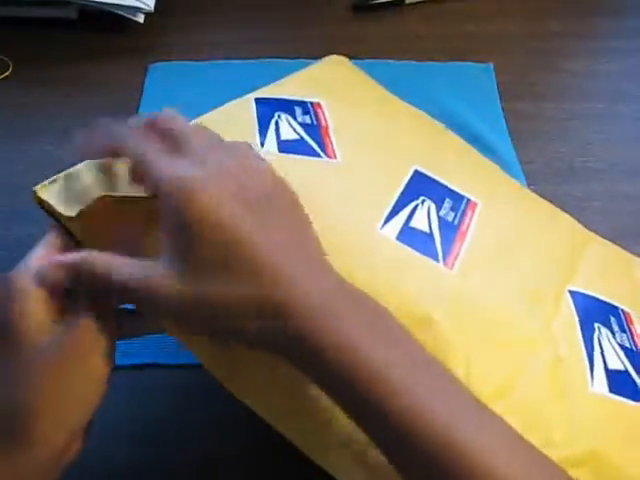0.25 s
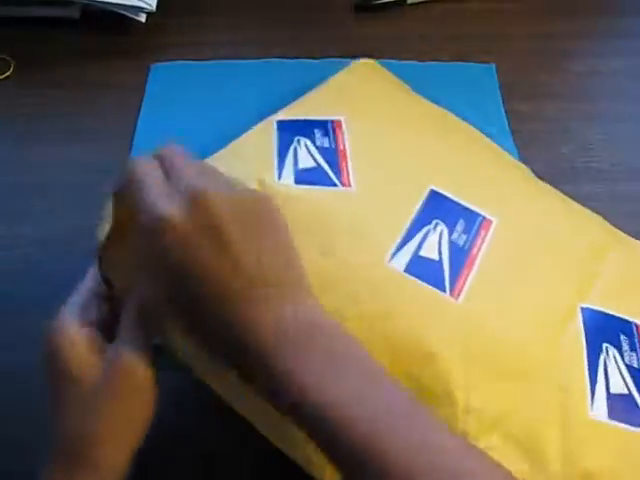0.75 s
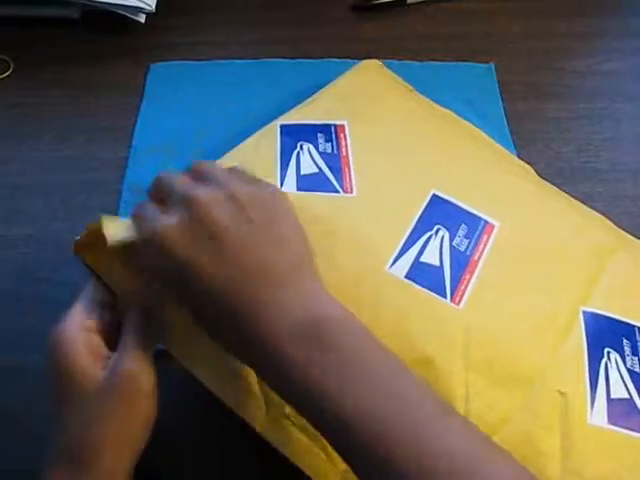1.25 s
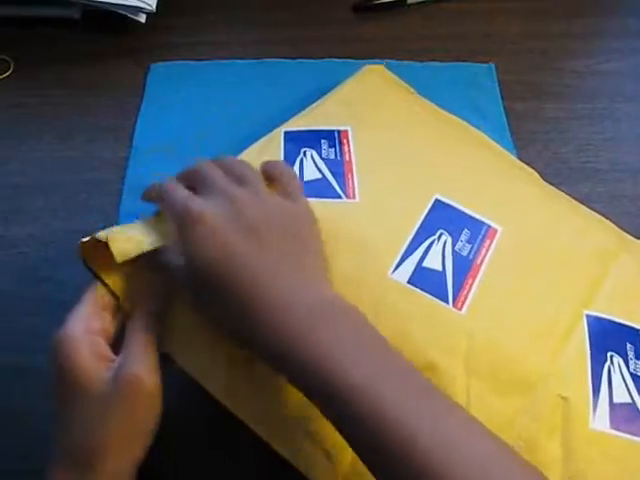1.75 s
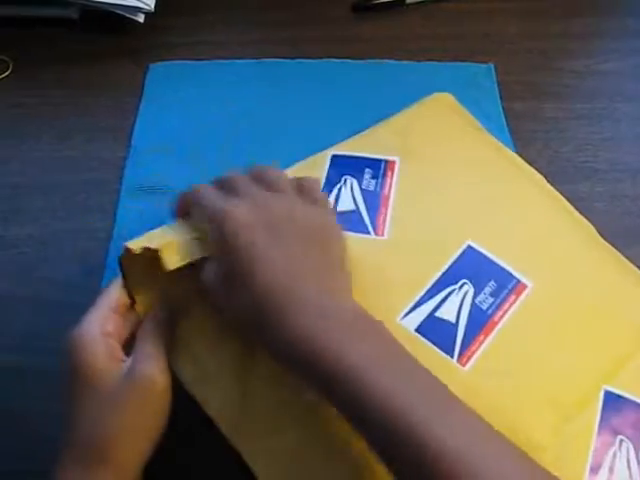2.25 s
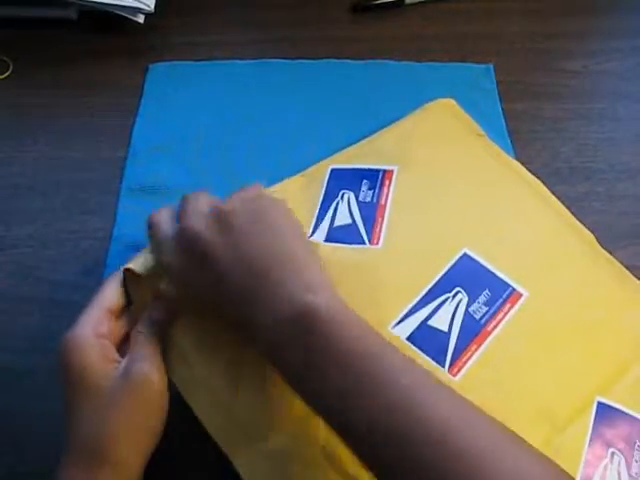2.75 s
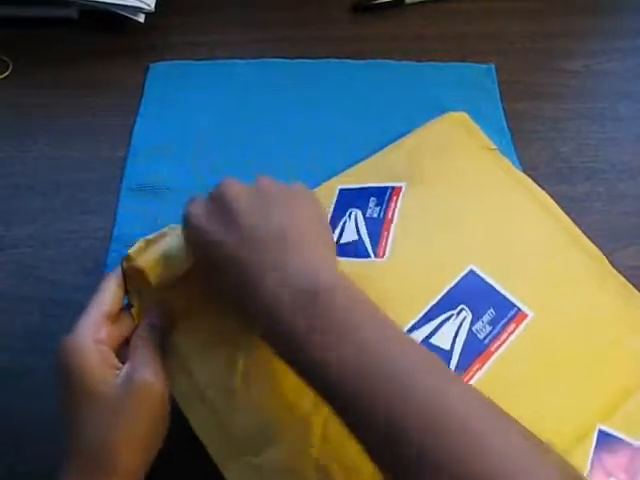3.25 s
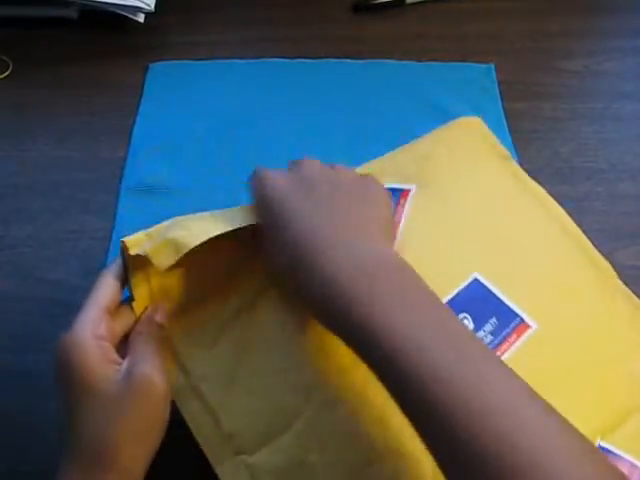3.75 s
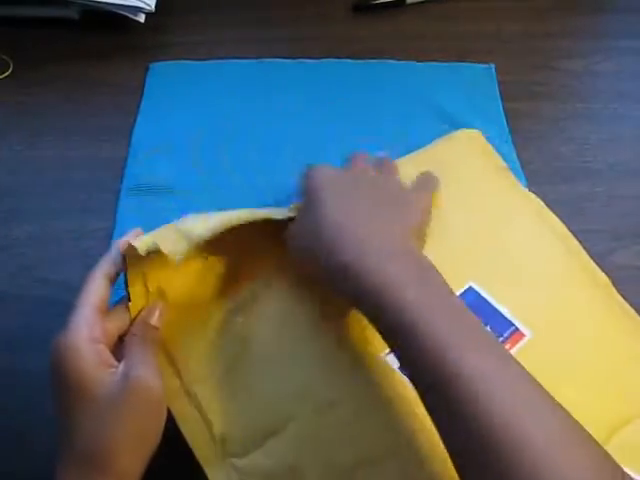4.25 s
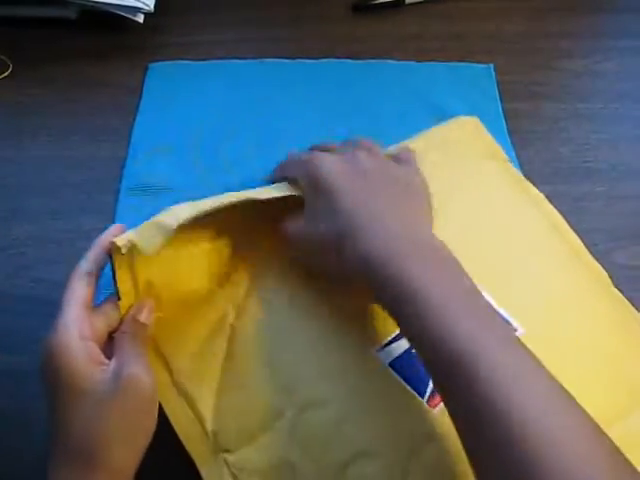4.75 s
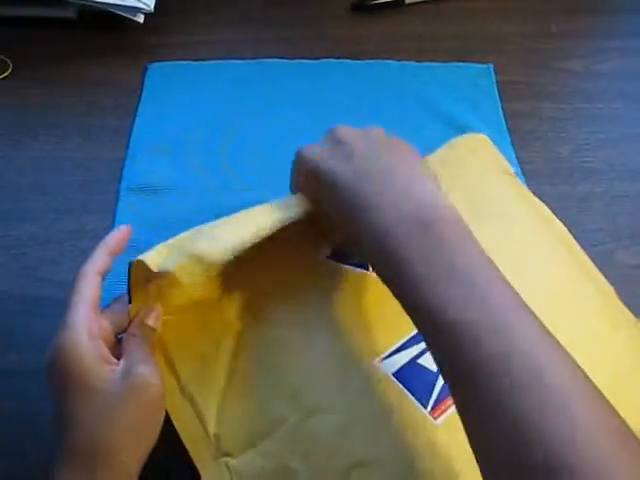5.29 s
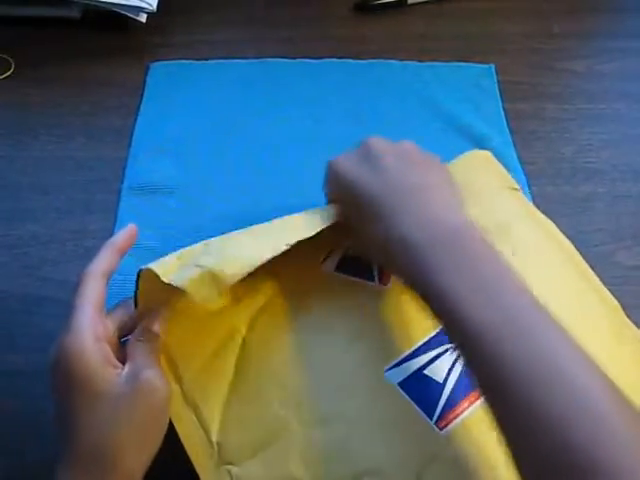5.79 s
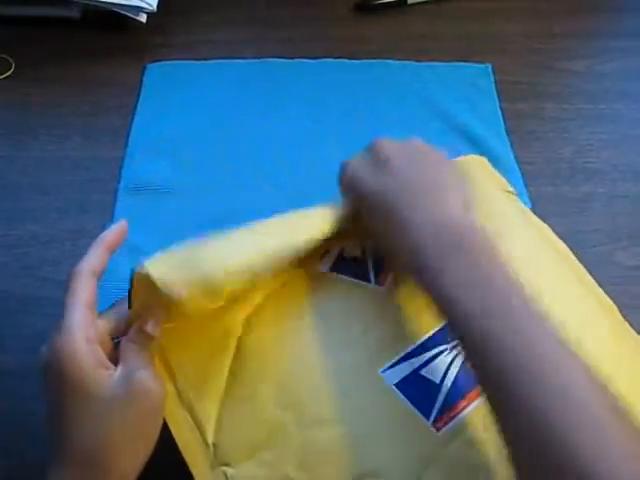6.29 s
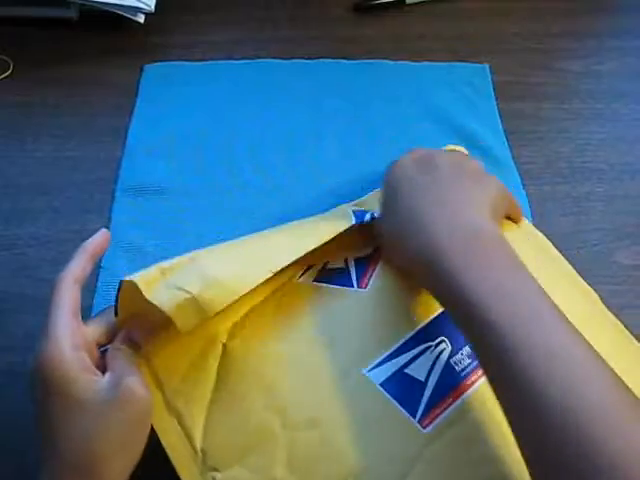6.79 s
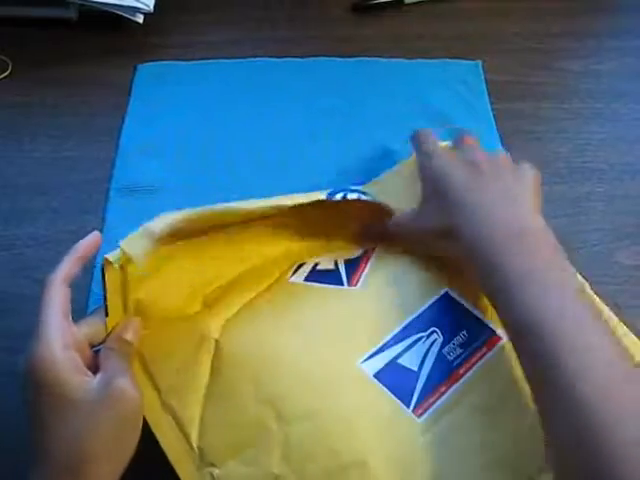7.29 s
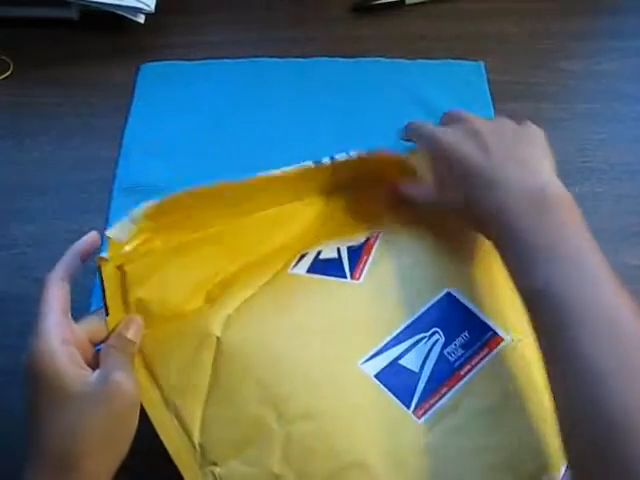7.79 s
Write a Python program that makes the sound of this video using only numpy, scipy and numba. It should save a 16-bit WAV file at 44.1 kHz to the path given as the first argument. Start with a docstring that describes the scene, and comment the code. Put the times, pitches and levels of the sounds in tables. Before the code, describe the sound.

Uneven hand tugs on thick paper: crisp clicks with short gaps at first, then fuller rustling, crumpling and tearing without real pauses. Hard bright snaps jump out of a swarm of tiny crackles, and big paper faces buckle with dull low pulses in the second half. Close stereo pickup, thin in the bass, very short room tail, faint ventilation-like hush.

```python
"""Paper mailer torn open on a table

A padded paper mailer is pulled open by hand, an arm's length from a small stereo camera microphone.
Creases, glue and fibres crackle in swarms of tiny damped rings; single folds snap loudly as clusters of
larger rings. Large faces flop over as low pulses, and two faint, longer low hums ring near 120 Hz.
A quiet furnished room answers with a brief tail of decaying noise, over a faint hush of filtered noise."""
import sys
import numpy as np
from scipy import signal
from scipy.fft import rfft, irfft, next_fast_len
from scipy.io import wavfile
from scipy.ndimage import uniform_filter1d
from numba import njit

SR = 44100
rng = np.random.default_rng(int(sys.argv[2]) if len(sys.argv) > 2 else 0)


def to_wav(sig):
    """Store sig (one row per channel, or 1-D mono) as 16-bit WAV at the path in sys.argv[1].

    Samples outside -1..1 are clipped; the rate is SR.
    """
    pcm = np.clip(np.atleast_2d(sig), -1, 1) * 32767
    pcm = np.round(pcm).astype(np.int16)
    wavfile.write(sys.argv[1], SR, pcm.T)  # frames by channels


N = 354123

# single folds of the paper: (time [s], nominal peak [dB], ring [Hz], panel thump [dB re peak],
# bright crack [dB re peak], crisp edge [dB re peak]); each part of the snap adds its own trim
FOLDS = [(0.024, -6, 1840, -12, -19.5, -39), (0.034, -18, 1690, -7, 0, -19), (0.066, -25, 1500, 0, -6, -15),
         (0.095, -27.5, 3600, 0, -3, 2), (0.144, -17.5, 6470, -32, 0.5, -7),
         (0.243, -16, 1850, -15, -1, -5), (0.292, -7.5, 1620, -16, 5, -2), (0.335, -29, 3750, -14, -5, 4),
         (0.377, -27.5, 3680, -7, 4, -3), (0.397, -29.5, 3900, 4, -3, -8), (0.471, -4, 1440, -30, 2.5, -9),
         (0.535, -18, 1400, 0, 2, -10), (0.687, -28, 2170, -23, -10, -11), (0.777, -6.5, 1600, -36, 0, -9),
         (0.79, -4, 6500, -29, -8, -9), (0.974, -15.5, 3220, -32, -6, -26),
         (0.99, -18.5, 1360, -27, -15, -21), (1.015, -14, 4000, -5, -6, -10),
         (1.021, -7, 2900, -5, 0, -2.5), (1.05, -26, 3510, -15, -2, -3), (1.135, -33, 4200, -20, -3, -12),
         (1.19, -28, 4000, -25, -6, -3), (1.211, -25, 3700, -28, -2, -4), (1.238, -2, 4260, -50, -11, -7),
         (1.27, -29, 4000, -20, -1, -8), (1.274, -22, 5000, -30, -6, -8), (1.31, -2.5, 3340, -49, 0, -18),
         (1.52, -18.5, 1900, -31, 1, -17), (1.56, -22, 2000, -29, -5, 2), (1.807, -28, 7500, -25, -10, 1),
         (1.838, -21, 5600, -27, -2, 0), (2.116, -19, 4870, -20, -7, -11), (2.132, -5, 4840, -40, -17, -28),
         (2.157, -5, 4440, -29, -9, -22), (2.374, -13, 3530, -13, 7, -2), (2.535, -17.5, 3470, -33.5, 6, 1),
         (2.591, -18.5, 5660, -10, -6, 7), (2.627, -18, 1250, -22, -14, -13),
         (2.69, -17, 8900, -14, -18, 0), (2.729, -26, 2410, -2, -8, 13), (2.74, -20.5, 900, -3, -15, -15),
         (2.754, -13, 2600, -20, -6, -10), (2.781, -10, 2460, -26, 4, -17), (2.899, -19, 875, -26, -9, -16),
         (2.919, -13.5, 2500, -8, 6.5, -34), (2.948, -8, 1660, -25, -12, -15),
         (3.017, -21, 1800, -20, -15, -20), (3.036, -12.5, 1660, -24, -20, -27),
         (3.157, -26, 2000, -15, -2, 0), (3.188, -13, 1870, -39, -33, -14), (3.32, -18, 2350, -30, -9, -14),
         (3.327, -16.5, 885, -26, -10, -17), (3.394, -13, 2630, -33, 5, 2),
         (3.437, 2, 2850, -13.5, -0.5, -14), (3.462, -7.5, 1550, -6, -14, -23),
         (3.588, -10, 1960, -9.5, 1.5, -2.5), (3.666, -15.5, 1570, -16, -7, -9),
         (3.752, -13, 2960, -32, -18, -9), (3.801, -11, 2840, -31, -15, -26.5),
         (3.82, -7, 1510, -14, 3.5, -1), (3.928, -0.5, 2740, -29, -7, -7), (4.037, -15, 2160, -6, -7, -1),
         (4.156, -8.5, 1570, -5, 1.5, -11), (4.255, -23, 1500, -12, -6, -12),
         (4.487, -18, 1660, -26, -13, -11), (4.548, -2, 1360, -10, 5.5, -1.5),
         (4.712, -17.5, 2092, -8, -13, 5), (4.795, -15, 1780, -2.5, 2, -8),
         (4.897, -8.5, 1520, -4, -12, -20), (4.948, -16, 920, -11, 9, -16),
         (5.084, -4, 1920, -11, -14, -10), (5.096, -7, 1610, -6, -14, -19), (5.111, -3, 2150, -15, -9, -22),
         (5.116, -6, 940, -8, -13, -17), (5.17, -21, 5800, -30, -8, 0), (5.226, -13, 1470, -36, -11, -9),
         (5.269, -5, 1510, -8.5, -18, -10), (5.465, -30, 2930, -24, -9.5, -16),
         (5.523, -13.5, 1910, -9, 0, -21), (5.6, -20, 1500, -2, -15, -15), (5.626, -17, 786, -2, -13, 2),
         (5.796, -15, 2020, -4, 4, -6.5), (5.804, -6.5, 2420, -22, -4, -5), (5.821, -2, 6000, -25, -12, -8),
         (5.828, -13, 6200, -25, -8, -10), (5.837, -14, 5400, -30, -8, -12),
         (5.841, -11, 5400, -30, -8, -12), (5.848, -9, 1940, -23, -10, -12),
         (5.897, -8.5, 5400, -11, -17, -14), (5.976, -23, 5360, -25, -8, 5),
         (6.093, -12.5, 1460, -28, -16, -15), (6.11, -19, 1490, 3, 5, 1),
         (6.194, -0.5, 8000, -16.5, -26, -31), (6.276, -10, 1890, -8, -20, -28),
         (6.31, -14, 1690, -6, -2, -14), (6.335, -5.5, 1770, -21, 5, -2),
         (6.341, -12.5, 2690, 3.5, -12, -10), (6.612, -18, 1540, -15, 4, 7.5),
         (6.798, -4, 1610, -37, -34, -36), (6.921, -1.5, 2280, -32, -9, -30),
         (6.945, -15, 2000, -16, -3, 2), (6.971, -9, 1540, -25, -9, 8), (6.989, -5.5, 1760, -2, -6, -2),
         (6.999, -5, 2100, -11, 7, -8), (7.017, -12, 3300, 2, -5, -2), (7.128, -15, 2400, 4, 2, -1),
         (7.187, -17.5, 2000, -4, -4, -16), (7.199, -10, 1800, -28, -6, -29),
         (7.209, -13, 2060, -4, -7, -19), (7.232, -24, 3800, -2, -5, -10), (7.35, -20, 1630, -5, 3.5, -14),
         (7.376, -20, 7500, -20, -9, -11), (7.576, -11.5, 1770, -4.5, 6, 7),
         (7.619, -14, 4200, -5, -1, -16), (7.703, -16, 3500, -30, 3, -14), (7.724, -15, 2020, -4, -10, -18),
         (7.923, -15.5, 1380, 0, -4, -20), (7.955, -16.5, 866, -20, -20.5, -9),
         (8.003, -15.5, 5830, -33, -19, 4)]
WIDE_HZ = 1740  # the close ports hear a source differently in full above this


def undb(db):
    """Turns decibels into an amplitude factor."""
    return 10 ** (np.asarray(db) / 20)


def level(x, db):
    """Scales a sound to an RMS level in dB."""
    return x * undb(db) / np.sqrt(np.mean(x ** 2))


def on_bins(table, size):
    """Reads a (frequency [Hz], value) table at every FFT bin, straight on a log axis."""
    hz, value = np.transpose(table)
    bin_hz = np.arange(size // 2 + 1) * SR / size
    return np.interp(np.log(bin_hz + 1), np.log(hz + 1), value)


def walk(rate):
    """Random levels held for 1 / rate seconds and slewed from one to the next; spread near 1."""
    hold = int(SR / rate)
    steps = np.repeat(rng.standard_normal(N // hold + 1), hold)
    return 1.01 * uniform_filter1d(steps, hold)[:N]


@njit
def rings(start, hz, cycles, rise, left, right):
    """Damped sines that swell within a fraction of a cycle and lose 20 dB in the given number of cycles."""
    out = np.zeros((2, N))
    for g in range(len(start)):
        turn = np.exp((2j * np.pi - np.log(10) / cycles[g]) * hz[g] / SR)
        closing = np.exp(-hz[g] / (rise * SR))
        z, gap = 1 + 0j, 1.
        first = int(start[g] * SR)
        last = min(first + int(3 * cycles[g] * SR / hz[g]), N)  # followed down to -60 dB
        for j in range(max(first, 0), last):
            out[0, j] += (left[g] * z).imag * (1 - gap)
            out[1, j] += (right[g] * z).imag * (1 - gap)
            z *= turn
            gap *= closing
    return out


def grains(start, hz, cycles, db, pan_db, sign):
    """Places each ring a little left or right, louder and earlier at the nearer port; long waves reach both alike."""
    rise_cycles = .3
    twist = .28  # radians of lead for each dB of lean
    size = np.sign(sign) * undb(db)
    lean_db = pan_db * np.minimum(hz / WIDE_HZ, 1) ** 2
    half = undb(lean_db / 2) * np.exp(.5j * lean_db * twist)
    return rings(start, np.clip(hz, 80., .4 * SR), cycles, rise_cycles, size * half, size / half)


def slips():
    """Stick and slip: the paper gives way suddenly, then the burst dies off; the hand's work stays the same."""
    slips_per_s, slip_size, fade_s = 90, 0.53, 0.0042
    chance = rng.random((2, N))
    jolts = (chance[0] < slips_per_s / SR) * -np.log(1 - chance[1])
    fading = signal.lfilter([1], [1, -np.exp(-1 / (fade_s * SR))], np.minimum(jolts, 2))
    burst = 1 + slip_size * fading
    return burst / np.sqrt(uniform_filter1d(burst ** 2, size=SR // 20))


def effort():
    """Gain of the four swarms: every tug builds up, holds and dies away, and every fold leaves the paper settling."""
    # tugs of the hand: (full force [s], hold [s], build-up [s per 20 dB], die-away [s per 20 dB],
    # creasing [dB], panel flex [dB re creasing], glue peel [dB re creasing], fibre rip [dB re creasing])
    tugs = [(.0, .12, .1, 0.16, -50, -6, 0, 1), (.25, 0.064, 0.032, 0.15, -49, -1, -5, 1.5),
            (0.433, 0.016, 0.024, 0.22, -37.5, -6.5, -5, -6), (.72, 0.078, 0.12, .05, -50.5, -15, -3, 8),
            (.793, 0.022, 0.043, 0.07, -24, -12.5, -4.5, -4), (1.0, 0.03, 0.082, 0.057, -48, 2, 3.5, 1.5),
            (1.167, 0.11, 0.063, 0.31, -47, -19, -3, -1), (1.38, 0.13, 0.067, 0.093, -49, -27, 0.5, 2),
            (1.534, 0.033, 0.066, 0.048, -35, -21, -4.5, 1), (1.685, 0.034, 0.073, 0.14, -40, -11, -1, -1),
            (1.876, 0.0014, 0.088, 0.11, -38, -10, 0, -4), (1.979, 0.0019, 0.048, 0.11, -32.5, -9, -3, 0.5),
            (2.08, 0.12, .1, 0.12, -35.5, -16, -7, -4), (2.104, 0.031, 0.016, 0.072, -29.5, -5, 7, 2.5),
            (2.335, 0, 0.12, 0.1, -32.5, -3, -3.5, -4), (2.464, 0.04, .03, 0.087, -28.5, -26, -6, -13),
            (2.73, 0.085, 0.32, .07, -31, -8, -3.5, -0.5),
            (2.923, 0.066, 0.052, 0.07, -32.5, -12, -4.5, -7.5),
            (3.097, 0, 0.09, .085, -28, -30, -13, -7.5), (3.223, 0.038, 0.17, 0.13, -34.5, -9, -5.5, -1),
            (3.44, 0, 0.16, 0.074, -21.5, -14, -8.5, -6.5),
            (3.597, 0.0016, 0.056, 0.071, -34, -8, -10, -10), (3.677, 0, 0.025, 0.055, -31, -20, -6, -3.5),
            (3.741, 0.01, 0.038, 0.13, -29.5, -22, -16, -5),
            (3.924, 0.091, 0.17, 0.11, -24.5, -12.5, -9.5, -6.5),
            (4.2, 0.033, 0.084, 0.078, -35.5, -2.5, -5, -4.5),
            (4.33, 0.12, 0.091, 0.053, -31, -9.5, -19, -5), (4.55, 0, 0.32, 0.25, -26.5, -9.5, -13, -8.5),
            (4.664, 0.035, 0.093, 0.053, -31, -6, -20, -1.5), (4.954, 0, 0.23, 0.096, -29, -8.5, -7.5, -4),
            (5.103, 0, 0.13, 0.078, -22.5, -7.5, -10, -8), (5.17, 0, 0.09, .1, -34.5, -14, -4, -5),
            (5.226, 0.09, 0.048, 0.068, -25.5, -11, -4, -3.5),
            (5.6, 0.023, 0.29, 0.02, -34.5, -8, -6.5, -5), (5.72, 0.079, 0.19, .05, -33.5, -5, -8, -7.5),
            (5.796, 0.034, 0.029, 0.15, -21.5, -13, -3.5, -5.5),
            (5.94, 0.016, 0.29, 0.052, -37.5, -5.5, -1, 3), (6.111, 0, 0.061, 0.18, -32, -8, -6, -5.5),
            (6.201, 0.0027, 0.038, 0.07, -34, -6, -18, -1), (6.413, 0, 0.17, 0.092, -23, -8.5, -9.5, -1),
            (6.49, 0.017, .1, 0.064, -36, -19, -5, -0.5), (6.63, 0.056, .09, .2, -39, -7, -3.5, -4),
            (6.745, 0.019, 0.058, 0.031, -32.5, -2.5, -5.5, -6),
            (6.81, 0.08, 0.011, 0.15, -38.5, -1, -10, -0.5),
            (7.004, 0.0042, 0.11, 0.064, -21, -6.5, -6, -4), (7.134, 0.00088, 0.057, 0.049, -34, 2, -9, -9),
            (7.199, 0.048, 0.017, 0.26, -39, -5.5, -6, -4), (7.438, 0.0012, 0.093, 0.048, -28, -6, -11, -5),
            (7.583, 0.03, 0.16, 0.22, -29, -7, -7.5, -1), (7.915, 0, 0.059, 0.077, -32, 0, -7.5, -5.5),
            (8.027, 0, 0.077, 0.088, -29.5, -16, -8, -5)]
    # the paper never lies quite still: (flex [dB], crease [dB], glue [dB], fibre [dB])
    rest_db = [-75, -63, -70.5, -60]
    # rustle after each fold, relative to its nominal peak: (flex [dB], crease [dB], glue [dB], fibre [dB])
    settle_db = [-50, -25.5, -42, -37.5]
    settle_s = 0.03  # per 20 dB
    hop = 64  # samples between gain points
    t = np.arange(0, N + hop, hop)[:, None] / SR

    full_s, hold, build, die, crease_db, flex_db, glue_db, fibre_db = np.transpose(tugs)
    before = np.maximum(full_s - t, 0) / build
    after = np.maximum(t - full_s - hold, 0) / die
    tug_power = undb(2 * (crease_db - 20 * (before + after)))
    mix_db = np.array([flex_db, 0 * full_s, glue_db, fibre_db]).T
    power = tug_power @ undb(2 * mix_db)

    fold_s, peak_db = np.transpose(FOLDS)[:2]
    fallen_db = 20 * np.abs(t - fold_s) / settle_s
    settling = np.sum((t > fold_s) * undb(2 * (peak_db - fallen_db)), axis=1)
    power = power + np.outer(settling, undb(settle_db) ** 2) + undb(rest_db) ** 2
    return [np.interp(np.arange(N) / SR, t[:, 0], np.sqrt(p)) for p in power.T]


def crackle():
    """Four swarms of grains and lone ticks; they bunch together, as one slip of the paper frees many at once."""
    # swarms, a row each for flex, crease, glue, fibre, lone ticks:
    # (pitch spread [octaves], ring-down [cycles per 20 dB], size scatter [dB])
    swarm_kinds = [(0.37, 2.7, 4.0), (0.38, 1.82, 1.5), (0.18, 3.9, 2), (0.43, 1.63, 1), (0.88, 1.4, 2.5)]
    # grain density: (flex [per s], crease [per s], glue [per s], fibre [per s], lone ticks [per s])
    grains_per_s = [1000, 1900, 1500, 4500, 70]
    # the span of the buckling creases changes as the hand moves along: (time [s], crease ring [Hz])
    crease_pitch = [(0.0, 1940), (0.51, 1570), (0.96, 2540), (1.16, 2030), (1.23, 2880), (1.5, 1860),
                    (1.68, 2130), (1.81, 1670), (2.28, 2100), (2.66, 1720), (2.78, 2380), (2.88, 1790),
                    (3.36, 1800), (3.42, 2200), (3.69, 1770), (3.74, 2470), (3.83, 1500), (3.9, 1980),
                    (4.25, 1910), (4.38, 2500), (4.45, 1900), (4.65, 2260), (4.8, 1840), (5.34, 1790),
                    (5.55, 2220), (5.64, 1460), (5.75, 1980), (6.02, 1910), (6.1, 1440), (6.17, 1960),
                    (6.69, 1900), (6.8, 1500), (6.93, 2200), (6.97, 1820), (7.35, 1530), (7.67, 2200),
                    (7.75, 1410), (7.81, 2200), (8.03, 1300)]
    # the size of the peeling patch sets its pitch: (time [s], glue ring [Hz])
    peel_pitch = [(0.0, 4770), (1.38, 4140), (1.79, 4550), (2.13, 4930), (2.75, 5200), (3.29, 4670),
                  (4.67, 5020), (5.28, 5430), (6.13, 5600), (6.95, 4500), (7.63, 4240), (8.03, 5070)]
    flex_hz, fibre_hz = 722, 8770
    tick_hz, tick_db = 3000, -10.5  # small creases that pop one at a time; dB relative to the creasing

    centres = [([0], [flex_hz]), np.transpose(crease_pitch), np.transpose(peel_pitch),
               ([0], [fibre_hz]), ([0], [tick_hz])]
    bunch, gains, out = slips(), effort(), 0
    gains = gains + [gains[1] * undb(tick_db)]
    for k, gain in enumerate(gains):
        octaves, cycles, scatter_db = swarm_kinds[k]
        count = int(grains_per_s[k] * N / SR)
        even = rng.random((2, count))
        bell = rng.standard_normal((4, count))
        start = even[0] * N / SR
        pitch = np.interp(start, *centres[k]) * 2 ** (octaves * bell[0])
        ring_cycles = cycles * 2 ** (0.046 * bell[1])
        size_db = scatter_db * np.minimum(-np.log(1 - even[1]), 4.2)  # many small, few large, none huge
        swarm = grains(start, pitch, ring_cycles, size_db, 0.84 * bell[2], bell[3])
        flicker = undb(2.18 * walk(50))
        out = out + level(swarm * bunch * flicker, 0) * gain
    return out


def hush():
    """Ventilation and distant house noise, nearly alike at both ports, its level wandering a little."""
    # colour of the hush before it is set to its level: (frequency [Hz], relative density [dB per Hz])
    hush_colour = [(25, 2), (60, 3), (120, 9.5), (250, 4), (600, 0.5), (2000, -1.5), (6000, -14),
                   (13000, -49)]
    shape = undb(on_bins(hush_colour, N))
    mid, side = (irfft(rfft(rng.standard_normal(N)) * shape, N) for _ in range(2))
    stereo = mid + 0.16 * side * np.array([[1], [-1]])
    return level(stereo * undb(1.8 * walk(5.5)), -48.5)


def snaps():
    """Each fold buckles one way and rings at its own pitch with a lower neighbour, a panel thump, a crack and an edge."""
    scatter_oct = .06  # how far the side rings of a fold stray
    tip_db = -10  # the very top of a fold's edge
    late_s = .0002
    fold_s, peak_db, hz, thump_db, crack_db, edge_db = np.transpose(FOLDS)
    bell = rng.standard_normal((14, len(fold_s)))
    one, out = np.ones(len(fold_s)), 0
    # (pitch [Hz], ring-down [cycles per 20 dB], level [dB])
    parts = [(hz, 3.4, peak_db + 1.5),
             (hz / 1.61, 2.2, peak_db - 5.5),
             (620 * one, 1.7, peak_db + thump_db + 2.5),
             (4600 * one, 3.0, peak_db + crack_db - 2.5),
             (8000 * one, 4.2, peak_db + edge_db + .1),
             (11500 * one, 4.5, peak_db + edge_db + tip_db)]
    for k, (pitch, cycles, db) in enumerate(parts):
        jitter, stray = bell[2 * k:2 * k + 2]
        start = fold_s + late_s + 0.00003 * jitter
        strayed = pitch * 2 ** (scatter_oct * stray * (k > 0))  # the main ring keeps its pitch
        out = out + grains(start, strayed, cycles * one, db, 1.1 * bell[-1], bell[-2])
    return out


def low_pulses_and_hums():
    """Low pulses of air from large faces flopping over, and two faint, longer low hums near 120 Hz; all damped rings."""
    # short rings are the flopping faces, the two of 22 cycles are the hums:
    # (time [s], peak [dB], ring [Hz], ring-down [cycles per 20 dB])
    low_rings = [(1.016, -20, 346, 1.8), (1.55, -33, 70, 3), (1.58, -42, 119, 22), (2.12, -39, 119.6, 22),
                 (3.427, -26, 248, 3.2), (3.926, -17, 348, 3.9), (4.152, -25, 236, 2.6),
                 (4.546, -16, 100, 1.3), (5.091, -14, 288, 2.8), (6.107, -18, 304, 2.5),
                 (6.61, -14.5, 360, 2.5), (6.995, -14, 290, 2.6), (7.188, -18.5, 197, 5.3),
                 (7.214, -19, 167, 2.8), (7.585, -21, 277, 2.6)]
    start, peak_db, hz, cycles = np.transpose(low_rings)
    return grains(start, hz, cycles, peak_db, 0 * start, rng.standard_normal(len(start)))


def room(x):
    """Adds a short diffuse tail that differs between the close ports only in the treble."""
    t60_s, gap_s, low_hz = 0.06, 0.00305, 736
    tail_db = -13  # energy of the tail relative to the direct sound
    t = np.arange(int(.5 * SR)) / SR
    mid, side = rng.standard_normal((2, len(t))) * undb(-60 * t / t60_s) * (t > gap_s)
    mid = signal.lfilter(*signal.butter(1, low_hz, "high", fs=SR), mid)
    side = signal.lfilter(*signal.butter(2, WIDE_HZ, "high", fs=SR), side)
    tail = mid + side * np.array([[1], [-1]])
    response = tail * undb(tail_db) / np.sqrt(np.sum(tail ** 2, axis=1, keepdims=True))
    response[:, 0] = 1  # direct sound
    return signal.fftconvolve(x, response, axes=1)[:, :N]


def scene():
    """The close sounds ring in the room, over the hush."""
    return room(crackle() + snaps() + low_pulses_and_hums()) + hush()


def record(dry):
    """Two close ports shade each other near 2-3 kHz; the capsule thins bass and top; peaks clip."""
    # response of the capsule: (frequency [Hz], gain [dB])
    mic_response = [(40, -17), (100, -18.5), (200, -13), (500, -5.5), (1500, -0.5), (3500, 4), (5300, 1),
                    (9000, 1), (13400, 1), (14200, -29), (15500, -28)]
    # level between the ports: (frequency [Hz], left minus right [dB])
    port_balance = [(100, -1), (300, -.2), (1300, -.3), (2400, -3.5), (4400, 0.3), (8000, 0.6),
                    (15000, -.6)]
    # phase between the ports: (frequency [Hz], lead of the left [radians])
    port_lead = [(100, 0.61), (1300, -0.081), (2000, 0.49), (3100, 0.67), (3900, 0.99), (4300, 0.7),
                 (11500, -0.63)]
    top_hz = 15700  # steep upper limit
    size = next_fast_len(N + 4096)
    half = undb(on_bins(port_balance, size) / 2) * np.exp(.5j * on_bins(port_lead, size))
    capsule = undb(on_bins(mic_response, size))
    ports = irfft(rfft(dry, size) * capsule * np.array([half, 1 / half]), size)[:, :N]
    lowpass = signal.ellip(8, .2, 70, top_hz, fs=SR, output="sos")
    return signal.sosfilt(lowpass, np.clip(ports, -1, 1))


dry = scene()
out = record(dry)
to_wav(out)
```